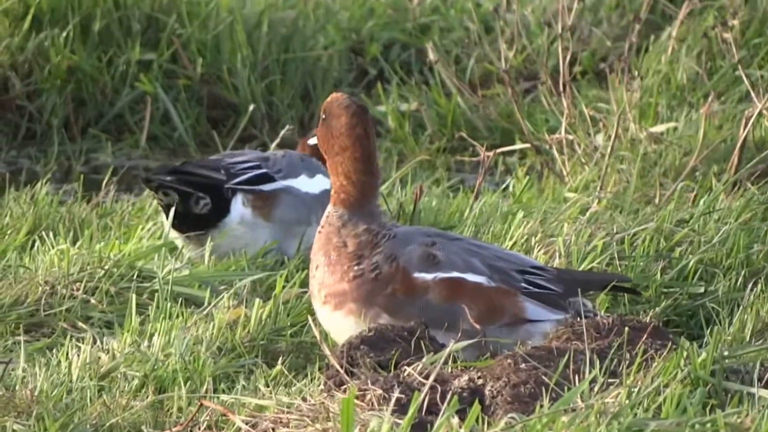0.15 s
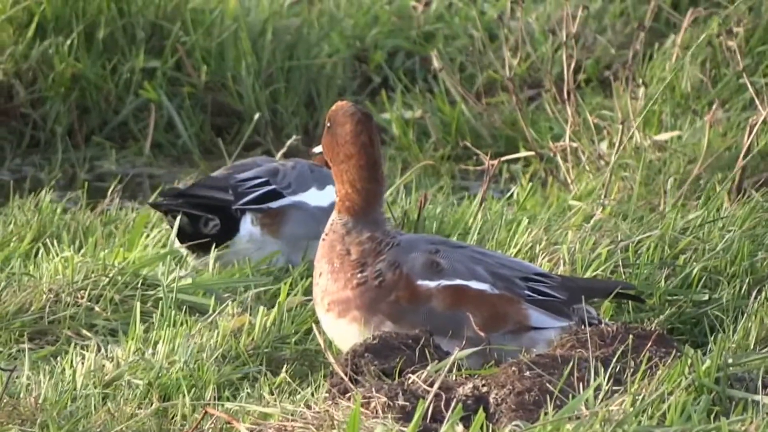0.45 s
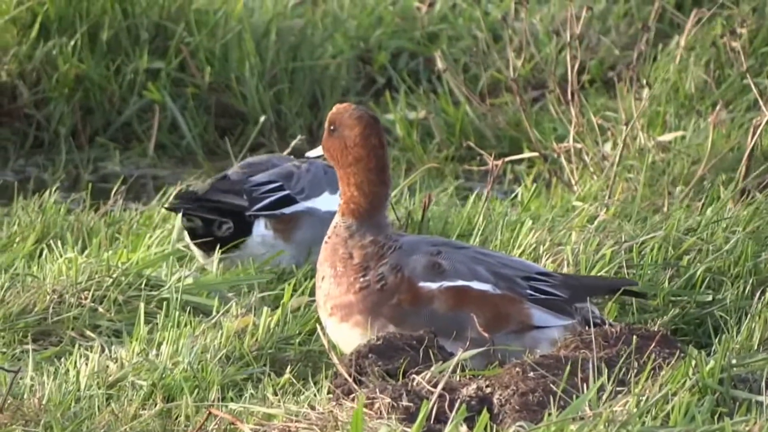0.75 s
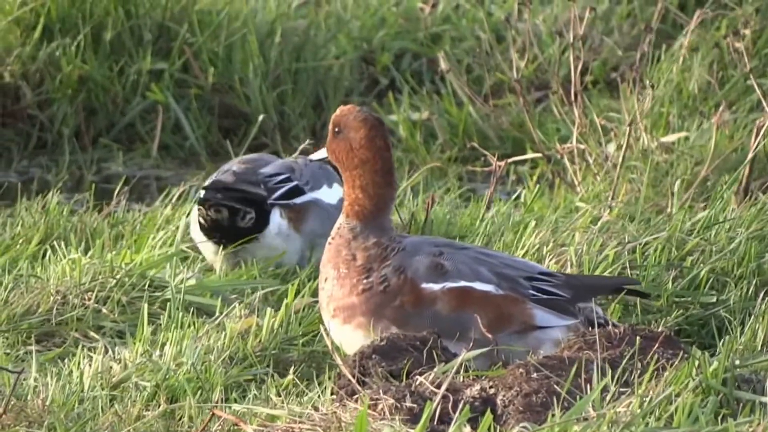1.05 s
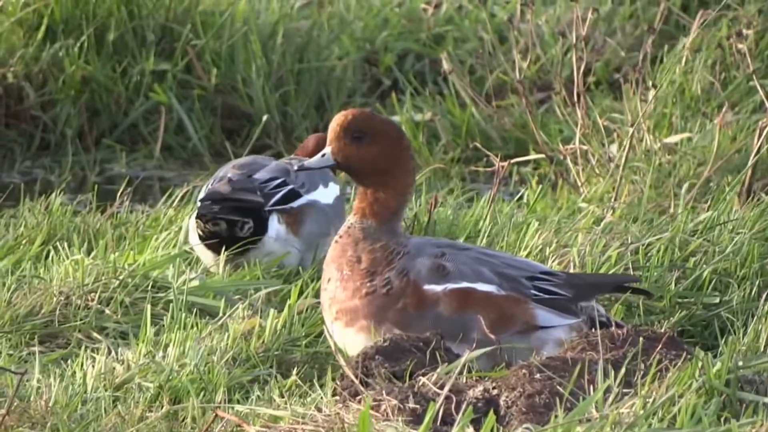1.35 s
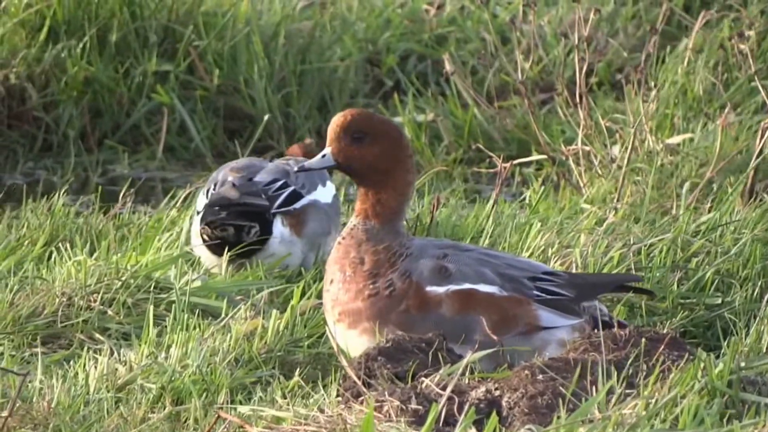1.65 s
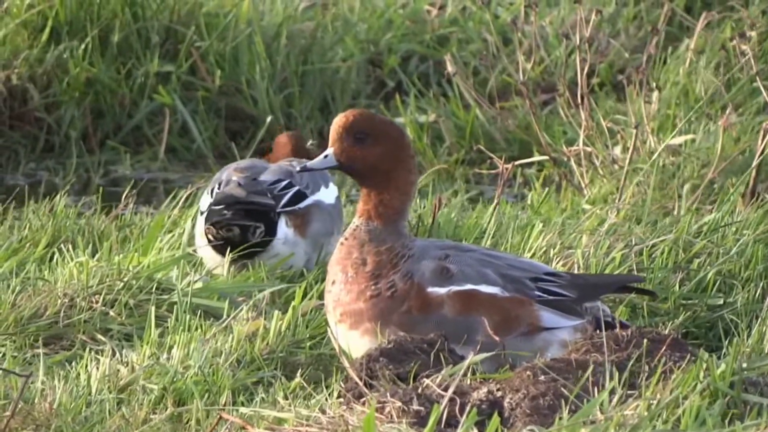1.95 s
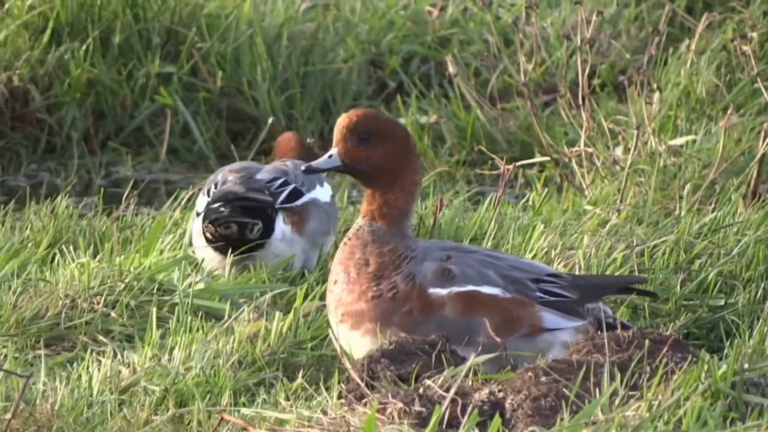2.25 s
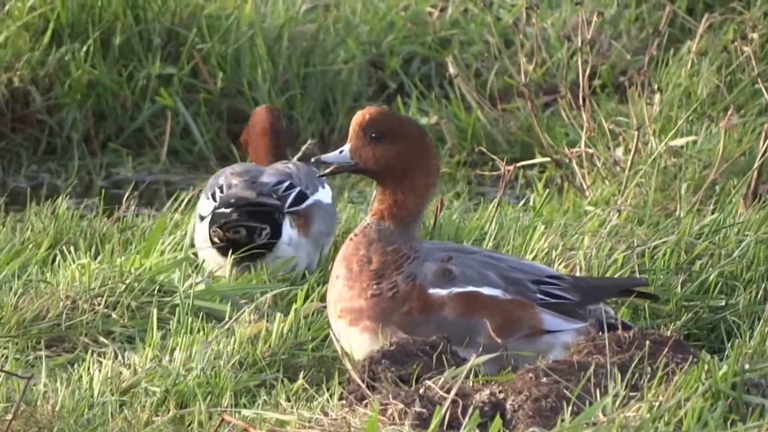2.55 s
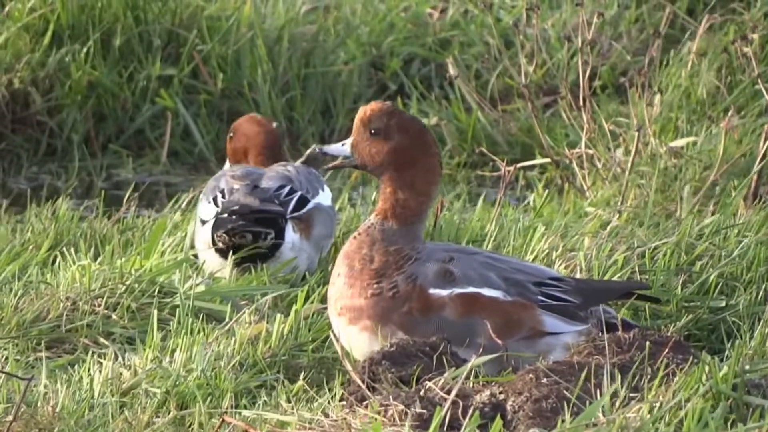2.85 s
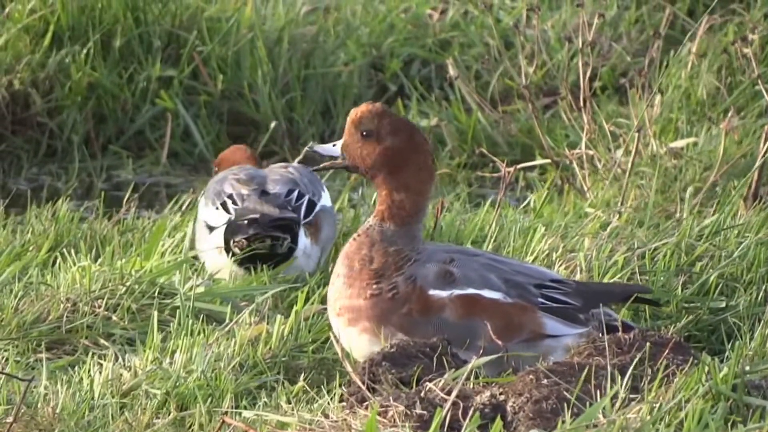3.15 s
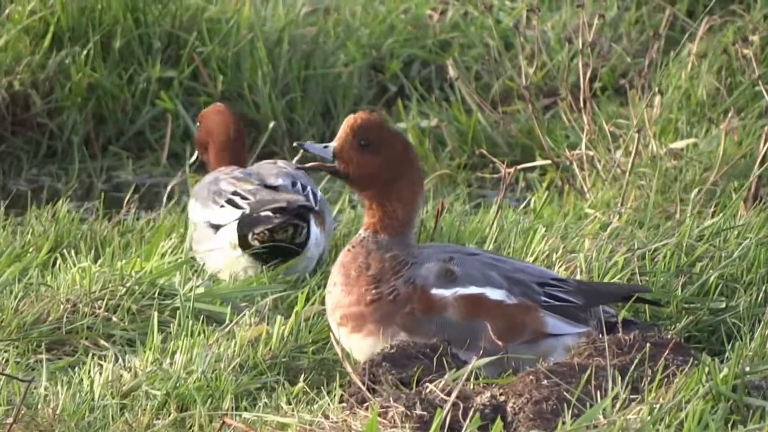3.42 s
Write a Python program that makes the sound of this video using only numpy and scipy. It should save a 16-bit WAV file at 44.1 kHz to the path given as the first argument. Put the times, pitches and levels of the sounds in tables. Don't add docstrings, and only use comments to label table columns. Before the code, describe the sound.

A duck's single whistle sounds at about 3.15-3.45 s, leaping quickly to a high, bright peak, then sliding down with a breathy edge and short outdoor echoes. Low, fluttering wind thumps the microphone throughout, easing briefly near 0.5 and 2.9 s. Faint dry bill clicks and grass rustles are scattered, clustering around 2.4 s; a tiny peep comes at 0.12 s. Soft far hiss and a very faint intermittent drone lie behind.

```python
import sys
import numpy as np
from scipy import signal
from scipy.fft import rfft, irfft, next_fast_len
from scipy.io import wavfile
from scipy.ndimage import uniform_filter1d, map_coordinates

SR = 44100
rng = np.random.default_rng(int(sys.argv[2]) if len(sys.argv) > 2 else 0)


def persist_wave(psi):
    counts = np.round(np.clip(psi, -1, 1) * 32767).astype(np.int16)
    wavfile.write(sys.argv[1], SR, np.atleast_2d(counts).T)


def volts_from_db(level):
    exponent = np.asarray(level, float) / 20
    return 10 ** exponent


N = 157878


def unit(x):
    return x / np.sqrt(np.mean(x ** 2) + 1e-20)


def along(points, hz):
    f, value = np.transpose(points)
    return np.interp(np.log(hz + 1), np.log(f + 1), value)


def curve(rows):
    return np.interp(np.arange(N) / SR, *np.transpose(rows))


def smooth(x, s):
    return uniform_filter1d(x, max(int(s * SR), 1))


def wobble(rate):
    knots = rng.standard_normal(int(N * rate / SR) + 4)
    return map_coordinates(knots, [np.arange(N) * rate / SR])


def flutter(rate):
    w = wobble(rate)
    return w - smooth(w, 7 / rate)


def filtered(x, response):
    m = next_fast_len(N + SR // 2)
    return irfft(rfft(x, m) * response(np.fft.rfftfreq(m, 1 / SR)), m)[..., :N]


def resonant(x, peaks):
    def shape(f):
        total = 0
        for k, (center, width, db) in enumerate(peaks):
            band = 1j * f * width / (center * center - f * f + 1j * f * width)
            total = total + (-1) ** k * volts_from_db(db) * band
        return total

    power = np.mean(np.abs(shape(np.linspace(1, SR / 2, 2000))) ** 2)
    return filtered(x, shape) / np.sqrt(power)


def spread(pair, spectrum, alike):
    def mid_side(hz):
        turn = np.arccos(np.clip(along(alike, hz), -1, 1)) / 2
        return volts_from_db(along(spectrum, hz)) * [np.cos(turn), np.sin(turn)]

    mid, side = filtered(pair, mid_side)
    return unit(np.array([mid + side, mid - side]))


def spotted(depth_db):
    z = signal.stft(rng.standard_normal((2, N)), nperseg=64)[2]
    field = unit(uniform_filter1d(rng.standard_normal(z.shape), size=4, axis=2))
    return unit(signal.istft(z * volts_from_db(depth_db * field), nperseg=64)[1][:, :N])


def wind():
    # t/s, level/dB
    gusts = [(0, -36.5), (.1, -40), (.465, -41), (.5, -57.5), (.58, -45.5), (.76, -48), (.86, -37),
             (1.02, -37), (1.3, -34.5), (1.85, -34), (2.1, -39.5), (2.5, -39), (2.6, -39.5), (2.78, -38),
             (2.94, -52.5), (3.05, -40.5), (3.3, -37.5), (3.58, -40)]
    # t/s, half length/s, extra level/dB
    flurries = [(0.023, 0.0061, 4.5), (0.109, .01, 6), (0.153, 0.033, 5), (0.208, 0.0088, 7),
                (.25, .01, 3.5), (0.353, 0.0032, 8), (0.385, 0.007, 5.5), (0.413, 0.0044, 4.5),
                (.6, 0.026, 3), (0.774, 0.0088, 4), (0.843, 0.017, 6), (0.954, 0.034, 9.5),
                (1.086, 0.0059, 4.5), (1.115, 0.0074, 4.5), (1.278, 0.024, 2.5), (1.37, .008, 3.5),
                (1.406, 0.019, 4), (1.583, 0.013, 4.5), (1.614, 0.015, 6.5), (1.691, 0.0093, 1),
                (1.788, .008, 3.5), (1.817, .008, 4), (1.878, 0.0096, 3.5), (1.91, 0.037, -5.5),
                (1.964, 0.0076, 4), (2.017, 0.0041, 1), (2.063, .005, 0.5), (2.12, 0.0067, 2),
                (2.175, 0.0057, 7), (2.235, 0.025, 2), (2.281, 0.015, -3), (2.319, 0.011, 5.5),
                (2.361, 0.0089, 5.5), (2.446, 0.0097, 3.5), (2.483, 0.0054, 8), (2.52, 0.0039, 5.5),
                (2.552, 0.0032, 2), (2.573, 0.04, -3.5), (2.732, 0.012, 4.5), (2.771, 0.0058, 0.5),
                (2.901, 0.015, 7), (2.986, 0.0052, 0), (3.249, 0.02, -7), (3.27, .005, 5),
                (3.288, 0.005, 5.5), (3.385, 0.0049, 6), (3.503, 0.0087, -8.5), (3.515, 0.0061, 7)]
    # f/Hz, density/dB per Hz
    buffet = [(15, -83), (25, -36), (88, -9), (172, -3), (306, -4), (408, -7), (557, -8.5), (2510, -34.5),
              (5000, -65.5), (6500, -80), (11000, -120)]
    # f/Hz, likeness (0 to 1)
    likeness = [(40, 0.86), (150, 0.82), (300, 0.73), (600, 0.51), (1500, 0.32), (3000, 0.13)]
    # f/Hz, lead/rad
    lead = [(40, .25), (90, 0.23), (180, 0.38), (350, 1.54), (780, 1.97), (1300, 0.19), (4000, 0.11)]
    eddies, eddy_db, eddy_spread_db = 2500, -3.5, 3
    edge_hz, edge_grows, edge_db = 1850, 1.49, -1.5
    thump_db = 22.5

    t, strength_db = np.arange(N) / SR, curve(gusts)
    mean_db = strength_db.mean()
    flurry_db = sum(db * np.exp(-((t - s) / half) ** 2) for s, half, db in flurries)
    gust_db = strength_db - mean_db + flurry_db

    when, port, size, sign = rng.random((eddies, 4)).T
    thumps = np.zeros((2, N))
    eddy = np.sign(sign - .5) * volts_from_db(-eddy_spread_db * np.log(size + 0.03))
    thumps[(2 * port).astype(int), (when * N).astype(int)] = eddy
    thumps = unit(thumps)
    for s, half, db in flurries:
        if db > 0 and half < .011:
            balance = np.array([1, rng.uniform(-1, 1)])
            thumps[:, round(s * SR)] += volts_from_db(thump_db) * rng.choice([-1, 1]) * balance

    lumps = volts_from_db(1.57 * np.array([flutter(40), flutter(40)]))
    turbulence = unit(lumps * rng.standard_normal((2, N)))
    rush = spread(turbulence + volts_from_db(eddy_db) * thumps, buffet, likeness)
    rush = filtered(rush, lambda hz: np.exp(.5j * along(lead, hz) * [[1], [-1]]))

    low = filtered(rush, lambda hz: 1 / (1 + (hz / edge_hz) ** 2))
    deep = filtered(low, lambda hz: 1 / (1 + (hz / 110) ** 4))
    flutter_db = 1.04 * flutter(60)
    edge_gain = volts_from_db(edge_db + edge_grows * (gust_db + flutter_db) + 2.9 * flutter(130))
    edge = edge_gain * (rush - low)
    body = volts_from_db(gust_db + flutter_db) * (low - deep)
    return volts_from_db(mean_db) * (volts_from_db(0.18 * gust_db + 0.8) * deep + body + edge)


def meadow():
    # f/Hz, density/dB per Hz
    hiss_colour = [(1500, -3.5), (3200, -15), (4200, -9), (6000, -16.5), (7500, -13), (9700, -14.5),
                   (11800, -27.5), (14200, -24)]
    # t/s, level/dB
    sway = [(0, 0), (.7, .5), (1, -1), (1.7, -0.5), (2, 1.5), (2.4, 1.5), (2.7, 0), (3.58, -.5)]
    # start/s, end/s, level/dB
    drone = [
        (0, .75, -60.5),
        (2.05, 2.55, -60),
    ]
    hiss_db, drone_hz, drone_width_hz = -64.5, 1340, 200

    likeness = [(2000, 0.95), (8000, 0.72), (13000, 0.71)]
    hiss = spread(rng.standard_normal((2, N)), [(200, -4)] + hiss_colour, likeness)
    t = np.arange(N) / SR
    gate = smooth(sum(volts_from_db(db) * ((t >= start) & (t < end)) for start, end, db in drone), 0.052)
    tone = resonant(rng.standard_normal(N), [(drone_hz, drone_width_hz, 0)])
    tone = unit(resonant(tone, [(drone_hz, 300, 0)]))
    return volts_from_db(hiss_db + curve(sway)) * hiss + gate * volts_from_db(1.9 * wobble(39.9) + 1) * tone


def bills():
    # t/s, peak level/dB, dull share/dB
    ticks = [(.0674, -63, -11), (.0744, -59, -15), (.081, -58, -20), (0.175, -51, 1), (.2154, -51, -14),
             (0.821, -45, -6), (.8235, -54, -18), (.8774, -58, -14), (1.038, -53.5, -7), (1.1045, -51, -8),
             (1.383, -60, -19), (1.3914, -53, -15), (1.5598, -44, -1), (1.564, -58, -14), (1.573, -52, -12),
             (1.581, -64, -13), (1.647, -57, -16), (1.8647, -53.5, -10), (2.358, -52, -50),
             (2.3648, -45.5, -35), (2.3728, -52, -36), (2.39, -46.5, -32), (2.3935, -56, -30),
             (2.398, -58, -30), (2.405, -56, -30), (2.4168, -54, -30), (2.4218, -58, -30),
             (2.4258, -48, -30), (2.4285, -58, -30), (2.6546, -49.5, 3), (2.888, -52, -30),
             (2.893, -43, -36), (3.167, -50, -9), (3.3084, -60, -27)]
    # start/s, length/s, level/dB, dull share/dB
    rustles = [(0, 0.0054, -56.5, 2.5), (0.087, 0.03, -64.5, -13), (0.166, 0.012, -57, -9),
               (0.175, 0.017, -56, -2.5), (0.203, 0.023, -55.5, -7.5), (0.818, 0.011, -53.5, -9),
               (0.828, 0.031, -61, -13), (0.868, 0.034, -70.5, -3), (1.392, 0.032, -70, 2),
               (1.562, 0.0098, -53.5, -3.5), (1.57, 0.044, -69, 1), (1.683, 0.042, -69, -8),
               (2.138, 0.011, -55.5, -6.5), (2.143, 0.024, -55, -11), (2.173, 0.22, -77.5, 5),
               (2.328, 0.18, -73, -7), (3.166, 0.015, -58, -1), (3.18, 0.26, -67.5, -6),
               (3.306, .01, -67, -14), (3.573, .01, -67, -2)]
    # f/Hz, width/Hz, level/dB
    bright = [(7070, 1200, 3), (9800, 1270, -2), (14100, 2800, -10)]
    # f/Hz, width/Hz, level/dB
    dull = [(3000, 2100, -0.67), (3780, 2800, -1.3)]
    tick_t60, tick_db = 0.0091, 9.5
    rustle_top_hz, tick_floor_hz, spot_db = 12200, 6200, 5

    push, rub = np.zeros((2, N + SR)), np.zeros((2, N))
    k = np.arange(SR // 50) / SR
    for s, db, dull_db in ticks:
        snap = (k == 0) + 0.055 * rng.standard_normal(len(k))
        crack = volts_from_db(db + tick_db - 60 * k / tick_t60) * snap
        share = np.clip(volts_from_db(dull_db), 0, .9)
        push[:, round(s * SR):][:, :len(k)] += crack * [[np.sqrt(1 - share ** 2)], [share]]
    for s, length, db, dull_db in rustles:
        u = np.arange(int(length * SR)) / (length * SR)
        swell = np.sqrt(np.clip(6 * u, 0, 1) * (1 - u ** 2))
        shape = volts_from_db(db) * swell * [[1], [volts_from_db(dull_db)]]
        rub[:, round(s * SR):][:, :len(u)] += shape[:, :N - round(s * SR)]

    grain = spotted(spot_db) * volts_from_db(1.2 * wobble(800))
    push = push[:, :N] + filtered(rub * grain, lambda hz: 1 / (1 + (hz / rustle_top_hz) ** 2))
    thin = filtered(push[0], lambda hz: (1j * hz / (tick_floor_hz + 1j * hz)) ** 2)
    bright_part = resonant(resonant(thin, bright), [(9600, 6800, 0)])
    dull_part = resonant(resonant(push[1], dull), [(3450, 3800, 0)])
    return 1.64 * bright_part + dull_part


def pip():
    start_s, pitch_hz, level_db, t60 = .1235, 7040, -34.5, 0.0097
    t = np.clip(np.arange(N) / SR - start_s, 0, None)
    envelope = volts_from_db(level_db - 60 * t / t60) * (1 - np.exp(-t / 0.00086))
    return envelope * np.sin(2 * np.pi * pitch_hz * t + 1.3 * wobble(1500))


def whistle():
    # start/s, start f/Hz, end f/Hz, arch/Hz, level/dB
    registers = [
        (3.155, 1340, 1740, -42, -57),
        (3.167, 1833, 2293, 2, -53.5),
        (3.177, 2450, 2890, 29, -46),
        (3.193, 3345, 3250, 189, -34.5),
        (3.289, 3294, 3000, 54, -37.5),
        (3.295, 2820, 2450, -28.5, -47.5),
        (3.344, 2176, 1946, -17.5, -51),
        (3.381, 1877, 1832, 0, -50),
        (3.397, 1777, 1570, 0, -52),
        (3.403, 1460, 1130, -3, -64),
    ]
    # f/Hz, level/dB
    tract = [(1500, -18), (2200, -3), (3500, 0.5), (3950, 6.5), (4500, -22), (6000, -14), (7400, -13),
             (10000, -18)]
    partials_db = [0, -5, -11, -34]
    # t/s, level/dB
    strain = [(3.16, 3.5), (3.187, 5), (3.197, 1), (3.22, 0), (3.24, -7), (3.262, 2.5), (3.29, 1),
              (3.3, -1.5), (3.37, 4)]
    # t/s, level/dB
    third_partial = [(3.187, -9), (3.2, -5), (3.26, -9), (3.272, 1), (3.29, 3), (3.3, -8), (3.32, -7),
                     (3.333, 6), (3.35, -5)]
    # t/s, level/dB
    effort = [(3.19, 0.5), (3.23, -0.5), (3.28, 0), (3.294, -7), (3.297, 2.5), (3.365, 0.5), (3.385, -7),
              (3.4, -6.5)]
    # t/s, level/dB
    breath = [(3.0, -87), (3.03, -70), (3.15, -66), (3.2, -55), (3.3, -62), (3.4, -66), (3.51, -67.5),
              (3.55, -77)]
    # f/Hz, width/Hz, level/dB
    breath_bands = [(3250, 160, 0.5), (3790, 280, 0), (7300, 210, -11), (8860, 250, -17), (9800, 150, -17)]
    end_s, jump_s, top_hz = 3.48, 0.0025, 12200
    pure_db = -6
    rasp_db, rasp_hz = -10.5, 884

    t, hz, gain = np.arange(N) / SR, np.full(N, 1400.), np.zeros(N)
    ends = [r[0] for r in registers[1:]] + [end_s]
    for (s, first_hz, last_hz, arch, db), end in zip(registers, ends):
        u = (t - s) / (end - s)
        on = (u >= 0) & (u < 1)
        glide = first_hz + (last_hz - first_hz) * u + 4 * arch * u * (1 - u)
        hz = np.where(on, glide, hz)
        gain = gain + on * volts_from_db(db)
    hz = smooth(hz, jump_s) * (1 + 0.0025 * wobble(150))
    phase = 2 * np.pi * np.cumsum(hz) / SR
    purity_db = pure_db * np.log2(hz / 2000) + curve(strain)

    tone = np.zeros(N)
    for k, db in enumerate(partials_db):
        partial_hz = (k + 1) * hz
        level_db = db + along(tract, partial_hz)
        rasp = 1
        if k > 0:
            level_db = level_db + purity_db + k * (wobble(83) + wobble(600))
            rasp = 1 + volts_from_db(rasp_db) * wobble(rasp_hz)
        if k == 2:
            level_db = level_db + curve(third_partial)
        tone += volts_from_db(level_db) * (partial_hz < top_hz) * rasp * np.sin((k + 1) * phase)

    air = volts_from_db(curve(breath) + 1.8 * wobble(30)) * resonant(rng.standard_normal(N), breath_bands)
    loudness = np.sqrt(2) * smooth(gain, jump_s) * volts_from_db(curve(effort) + 0.3 * wobble(300))
    return loudness * tone + air


def bank(x):
    t = np.arange(SR // 4) / SR
    tail = rng.standard_normal((2, len(t))) * volts_from_db(-60 * t / 0.14)
    return signal.fftconvolve(x[None], tail / np.linalg.norm(tail[0]), axes=1)[:, :N]


def scene():
    air = wind() + meadow()
    ducks = bills() + pip() + whistle()
    return ducks * volts_from_db([[.1], [-.1]]) + volts_from_db(-13.5) * bank(ducks) + air


def band_limit(x):
    return signal.sosfilt(signal.butter(12, 15890, fs=SR, output="sos"), x)


def record(dry):
    ceiling, top_hz = .09, 15300
    soft = dry / (1 + np.abs(dry / ceiling) ** 8) ** (1 / 8)
    mix = filtered(soft, lambda hz: 1 / (1 + (hz / top_hz) ** 60))
    return band_limit(mix)


dry = scene()
out = record(dry)
persist_wave(out)
```